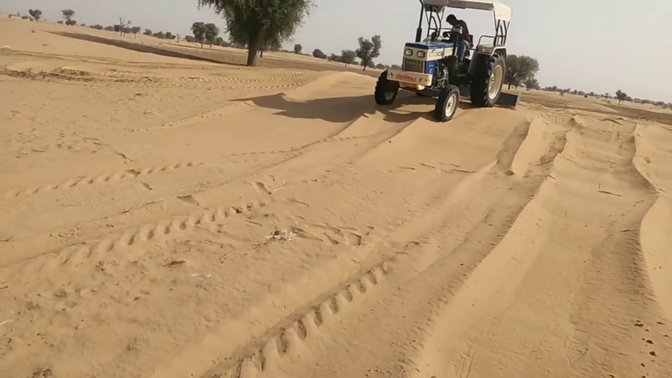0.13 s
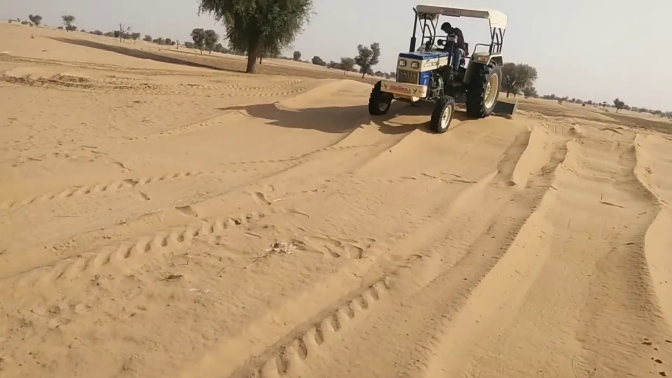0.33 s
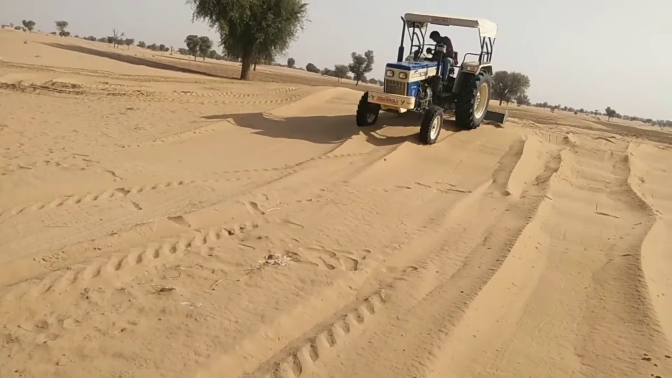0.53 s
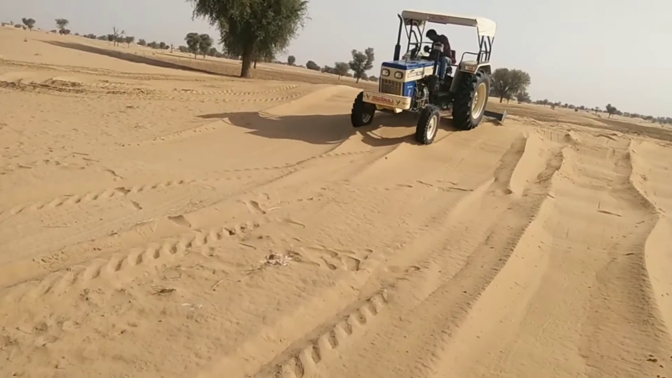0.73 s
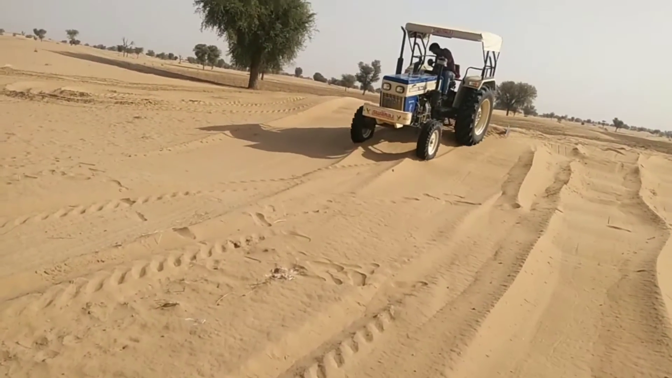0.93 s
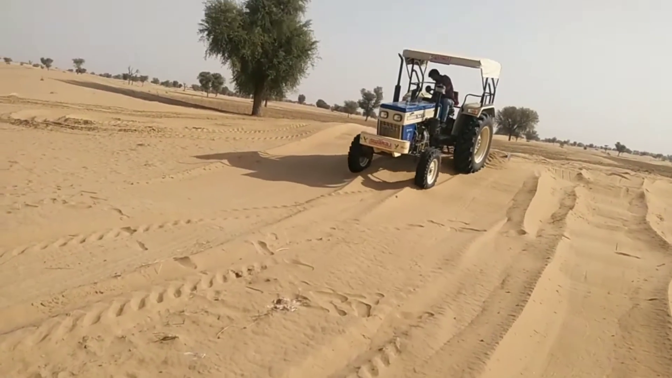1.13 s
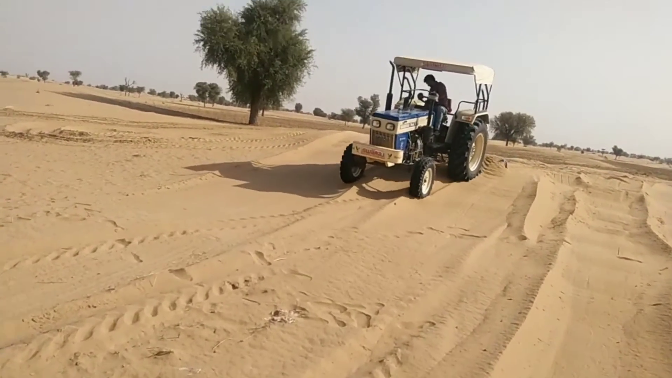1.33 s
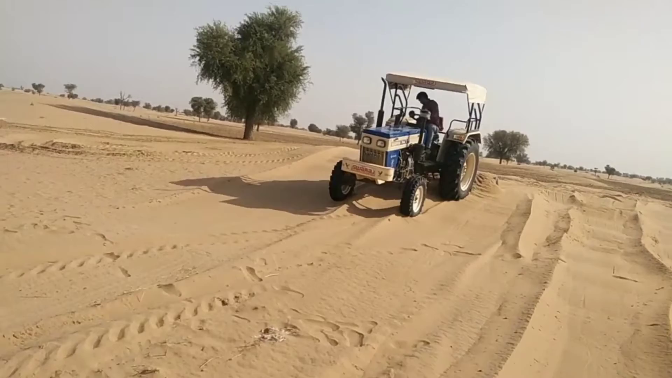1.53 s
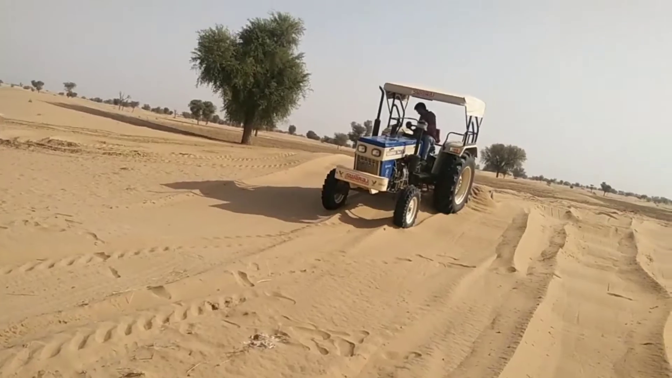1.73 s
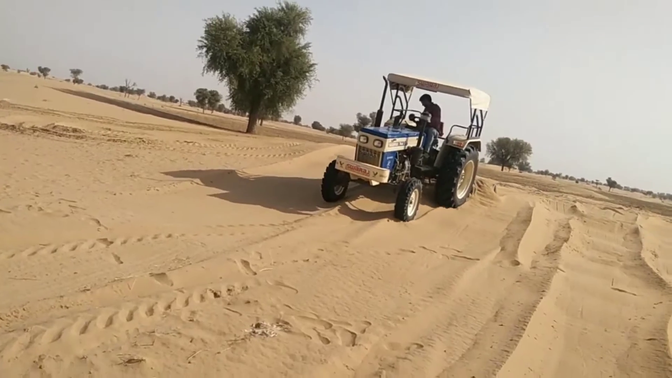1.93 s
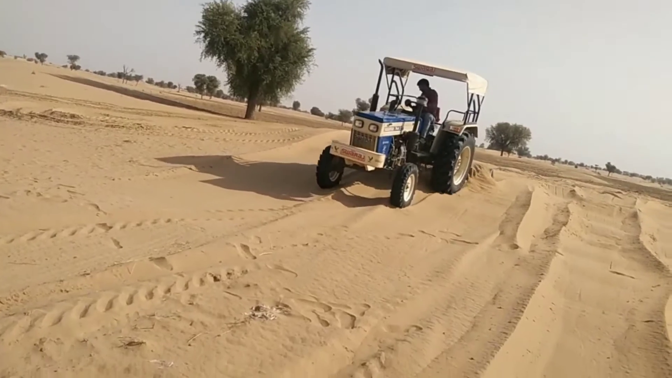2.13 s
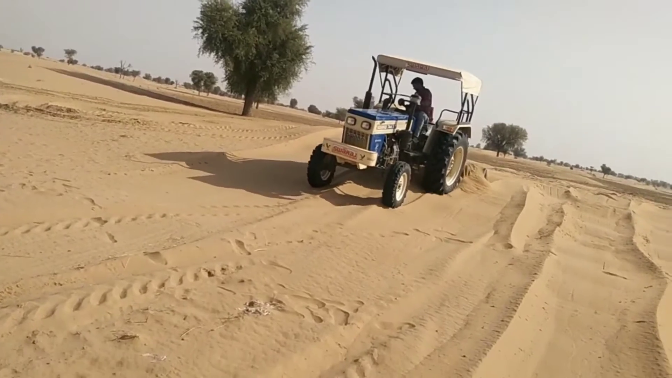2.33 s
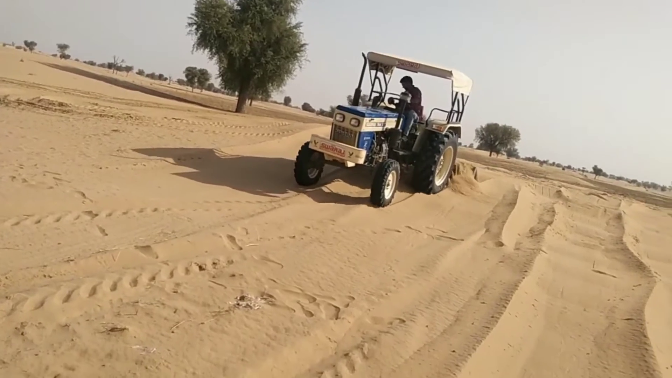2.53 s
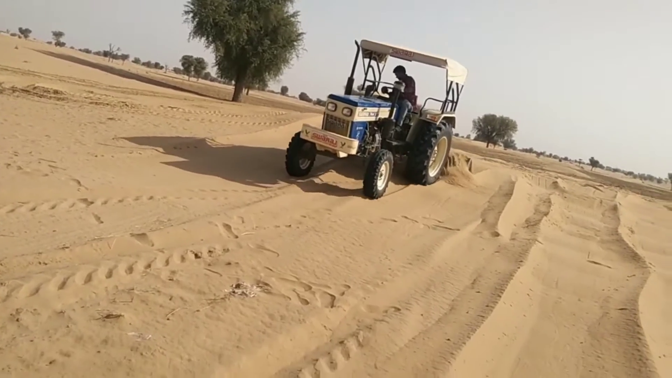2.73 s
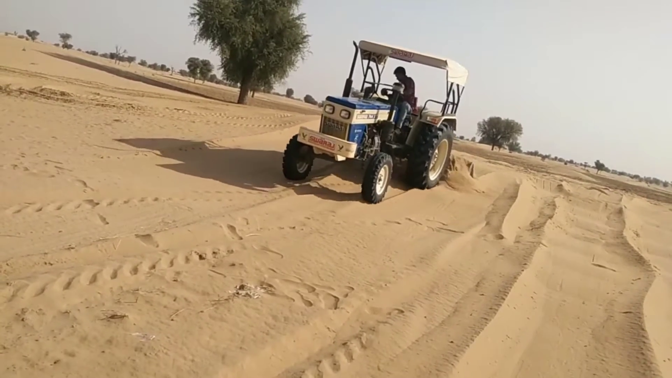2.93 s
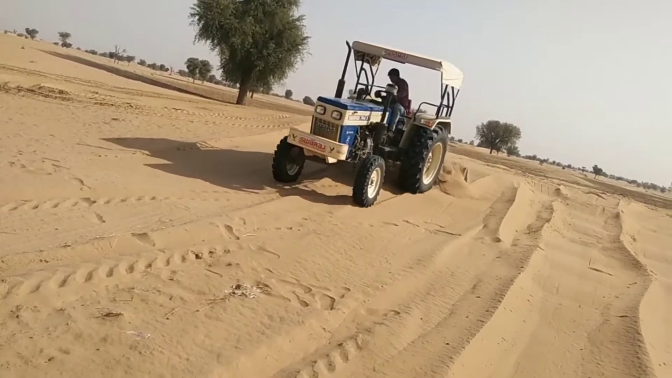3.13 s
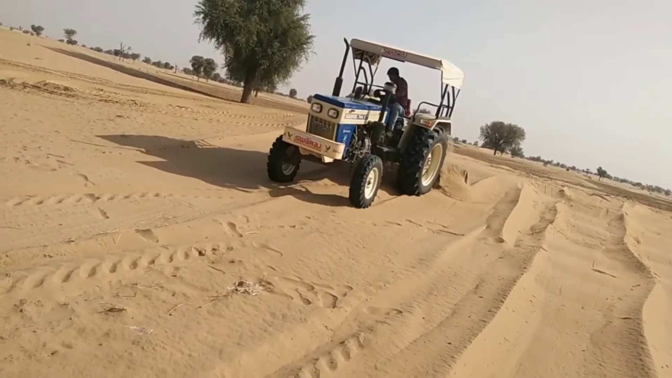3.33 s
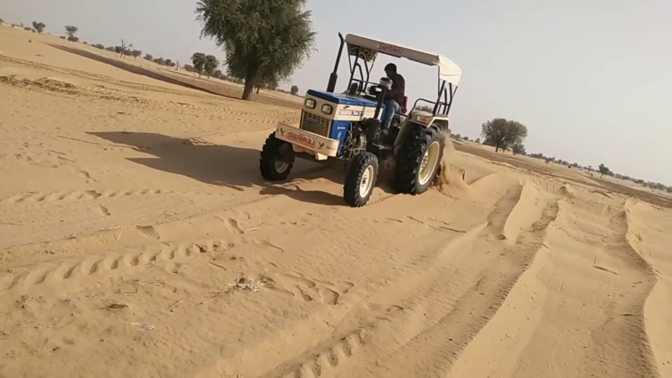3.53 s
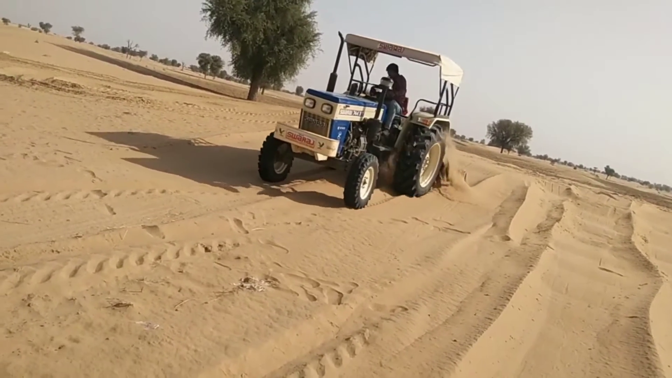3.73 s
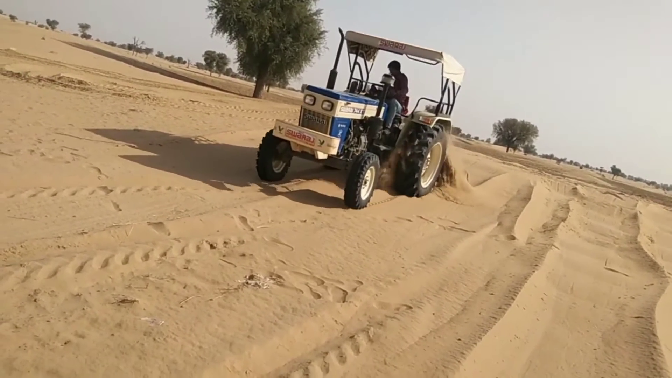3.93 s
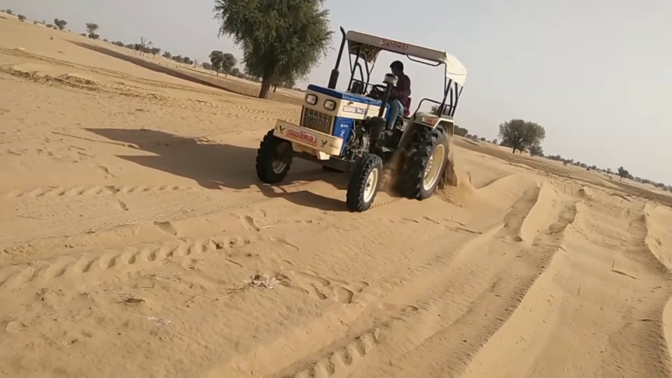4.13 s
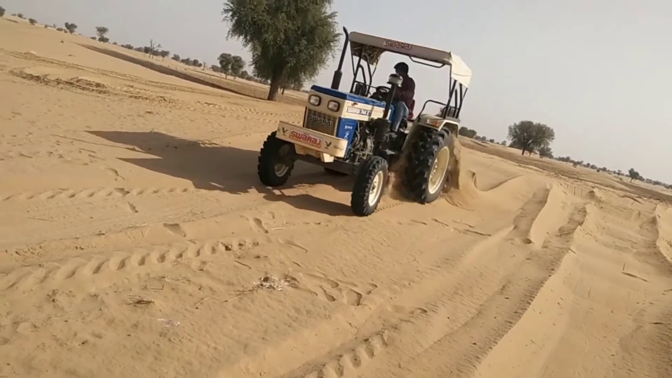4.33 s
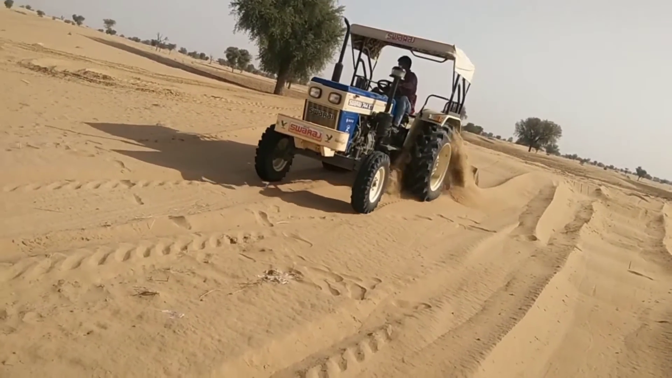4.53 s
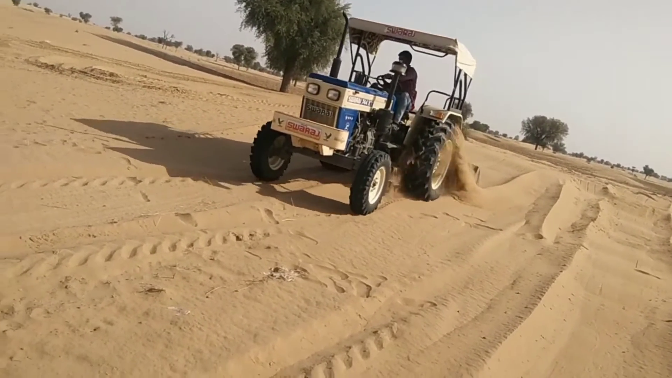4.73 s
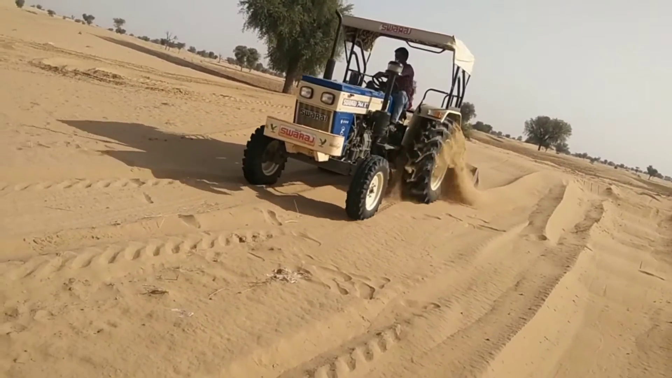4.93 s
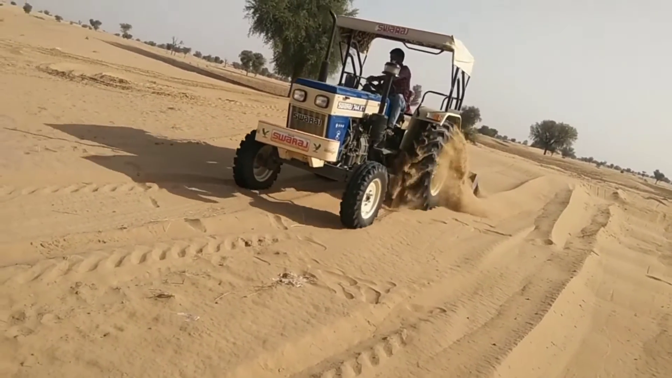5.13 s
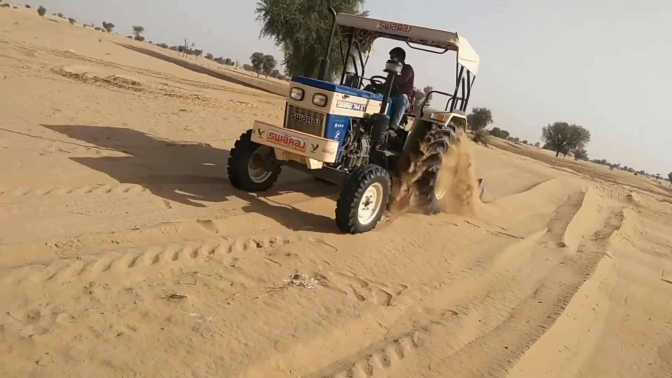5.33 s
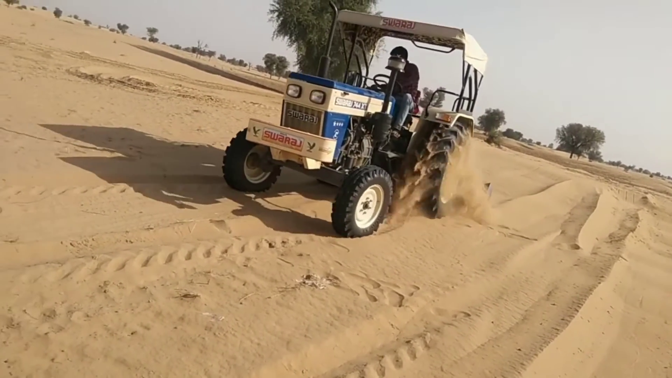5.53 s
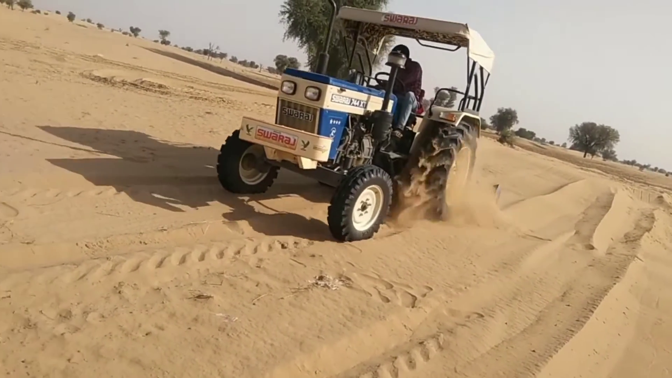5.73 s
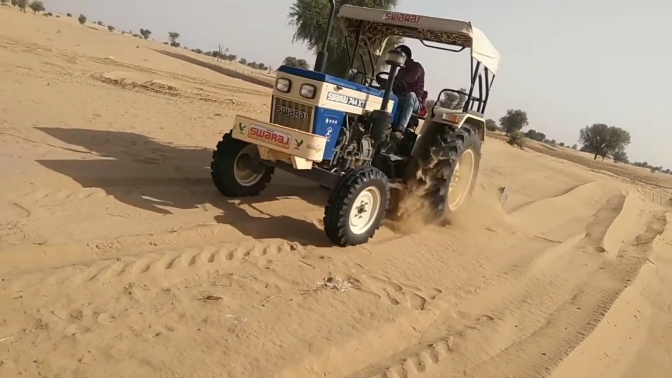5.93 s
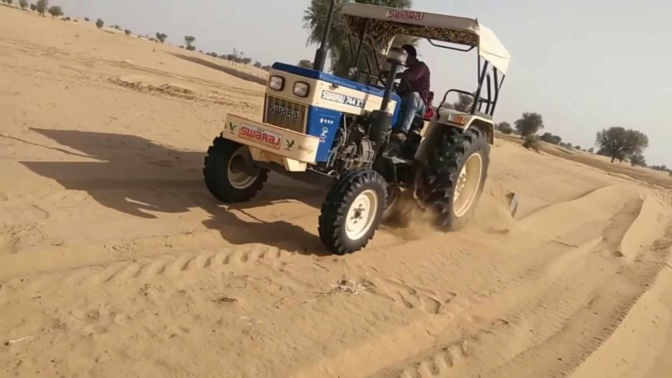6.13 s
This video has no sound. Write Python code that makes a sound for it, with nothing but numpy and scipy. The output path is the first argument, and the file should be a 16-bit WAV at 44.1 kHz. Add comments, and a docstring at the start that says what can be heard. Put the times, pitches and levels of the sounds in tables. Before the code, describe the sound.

A diesel tractor clatters closer outdoors, bogs down after about a second, and labours with hard metallic knocking, brief squeals and sand spraying off its wheels.

```python
"""Loose sand: a two-cylinder diesel tractor crawls closer; after a good second it bogs down and labours.
Each firing sets off metal contacts, modelled as noise ringing in block and bonnet, with bright ticking.
Crank-locked cosines and rumble make the exhaust; tones tied to the crank, with slip, make a low hum.
Coloured random grains are sand off the wheels; decaying noise and sines are the strained parts' ring,
squeals and a late panel boom. A widener spreads it all with short fixed echoes."""
import sys
import numpy as np
from scipy import signal
from scipy.fft import rfft, irfft, next_fast_len
from scipy.io import wavfile
from scipy.ndimage import uniform_filter1d, minimum_filter1d

SR = 44100
rng = np.random.default_rng(int(sys.argv[2]) if len(sys.argv) > 2 else 0)


def waveform_to_disk(signal):
    """Save audio, clipped to [-1, 1], as 16-bit WAV at the path in sys.argv[1]."""
    frames = np.transpose(np.atleast_2d(signal))
    scaled = np.clip(frames, -1, 1) * 32767
    samples = np.round(scaled).astype(np.int16)
    wavfile.write(sys.argv[1], SR, samples)


N = 272538
TIME = np.arange(N) / SR
SIZE = next_fast_len(N + SR // 4, True) // 2 * 2  # even padded FFT length
HZ = np.maximum(np.arange(SIZE // 2 + 1) * SR / SIZE, 1)


def from_db(db):
    """Decibels to amplitude gain."""
    return 10 ** (np.asarray(db) / 20)


def rms_one(x):
    """Scale to unit power."""
    return x / np.sqrt(np.mean(x ** 2) + 1e-20)


def in_time(rows):
    """Each column of a curve at every sample."""
    s, *columns = np.transpose(rows)
    return [np.interp(TIME, s, c) for c in columns]


def spectrum(points):
    """Curve in dB at every FFT frequency, straight over log frequency."""
    hz, db = np.transpose(points)
    return np.interp(np.log(HZ), np.log(hz), db)


def colour(x, db):
    """Minimum-phase (causal) filter with the given gain curve; unit power out."""
    cepstrum = irfft(np.log(from_db(db)))
    # fold onto positive time
    cepstrum[1:SIZE // 2] *= 2
    cepstrum[SIZE // 2 + 1:] = 0
    response = np.exp(rfft(cepstrum))
    return rms_one(irfft(rfft(x, SIZE) * response)[:N])


def drift(knots_per_s):
    """Slow chance: normal random knots joined by straight lines."""
    knots = rng.standard_normal(2048)
    return np.interp(TIME * knots_per_s, np.arange(len(knots)), knots)


def bursts(times_s, power, decay_s):
    """Power that jumps at each contact and dies away exponentially."""
    clicks = np.zeros(N)
    np.add.at(clicks, np.clip((times_s * SR).astype(int), 0, N - 1), power)
    return signal.lfilter([1], [1, -np.exp(-1 / (decay_s * SR))], clicks)


def turning(views):
    """Crossfade from one angle of view to the next as the tractor nears."""
    # (start [s], end [s]) of each change of view
    view_changes = [(1.15, 1.57), (3.3, 3.3), (4.5, 4.68), (5.23, 5.3)]
    out = views[0]
    for span_s, view in zip(view_changes, views[1:]):
        out = out + np.interp(TIME, span_s, [0, 1]) * (view - out)
    return out


def layer_db(law, load):
    """Level of an engine layer, linear in load and in a steady approach."""
    base_db, load_db, approach_db = law
    return base_db + load_db * load + approach_db * TIME / TIME[-1]


def knocking(turns, load):
    """Clatter power, mean near 1: a cluster of contacts per crank turn over steady gear whirr."""
    # contacts after each firing: (angle [crank turns], level [dB])
    contacts = [(.06, -2), (.14, 0), (.23, -.5), (.33, -1.5), (.44, -4)]
    decay_s, jitter_turns, contact_db, firing_db = .0026, .016, 1.1, .7
    firing = np.arange(int(turns[-1]) + 1)[:, None]
    angle_turns, level_db = np.transpose(contacts)
    chance = rng.standard_normal((len(firing), 3, len(angle_turns)))
    contact_turns = firing + angle_turns + jitter_turns * chance[:, 0]
    times_s = np.interp(contact_turns, turns, TIME, left=-1, right=-1)
    spread_db = contact_db * chance[:, 1] + firing_db * chance[:, 2, :1]
    power = from_db(level_db + spread_db) ** 2
    inside = times_s >= 0
    knocks = bursts(times_s[inside], power[inside], decay_s)
    # divide by the local mean
    knocks /= uniform_filter1d(uniform_filter1d(knocks, size=4200), size=2800) + 1e-9
    knock_share = np.clip(1.6 * load, .25, .92)
    return 1 - knock_share + knock_share * knocks


def shaking(power, snap_s=0.00033):
    """Each rise in power gives a sharp snap, then a dense run of tiny impacts of random sign."""
    impacts_per_s = 4000  # nominal: coincident impacts merge
    jump = np.maximum(np.diff(power, prepend=power[0]), 0)
    steps = rng.exponential(1, N) ** 2 / 2
    count = np.floor(np.cumsum(steps) * impacts_per_s / SR)
    impacts = np.diff(count, prepend=0) > 0
    snaps = np.sqrt(jump * snap_s * SR)
    chatter = np.sqrt(power) * rms_one(1. * impacts)
    return (snaps + chatter) * rng.choice([-1, 1], N)


def engine_force(power, low_hz=1650, high_hz=3800):
    """Force on the block: sharpest knocks in its own band, more even shaking outside it."""
    outside_exponent = .6
    inside = signal.butter(3, [low_hz, high_hz], "band", fs=SR, output="sos")
    outside = signal.butter(3, [low_hz, high_hz], "bandstop", fs=SR, output="sos")
    sharp = signal.sosfilt(inside, rms_one(shaking(power)))
    even = signal.sosfilt(outside, rms_one(shaking(power ** outside_exponent)))
    return sharp + even


def engine_body(force):
    """Block and bonnet resonances ring; their balance shifts with the view and wavers by chance."""
    # resonances: (centre [Hz], width [Hz], height from each of five views, far to near [dB] x 5)
    body_modes = np.array([(210, 98, 14, 2.5, 5, 0.5, -1), (313, 43, 0.5, 1.0, 2.5, 0, 8.5),
                           (440, 110, 1, 1.5, -2.5, -10, -3.5), (728.4, 57, 8.6, 3.5, 7, 7.5, 10.5),
                           (823, 87, 0.88, 9.5, 10.5, 11, 9.5), (1017, 115, 4.6, 0, -10, -13.5, -6),
                           (1136, 146, 8.4, 5, 9, 11, 8.5), (1324, 92, 3.9, 4, 4.5, 3.5, 5.5),
                           (1444, 41, 4.9, 5.5, 5.5, -5, 11), (1555, 73, 4, 1.5, -2.5, 11.5, 3.5),
                           (1777, 31, 3.7, -15, 5.5, 0, -2), (1876, 138, 2.4, 10.5, 7.5, -0.5, 6),
                           (1995, 170, 4.7, -3, -0.5, -1, 2), (2236, 170, 2, 6, 9.5, 7.5, 7.5),
                           (2450, 55, 7.9, 6.5, 2.5, 5, 9), (2656, 97, 8.3, 12, 9.5, 3.5, 10),
                           (2817, 150, 5.9, 2, 8, 8.5, 7.5), (2937, 52, 2.5, 11.5, 7, 7, 5.5),
                           (3080, 80, 8.4, -6, -9, 7.5, 5), (3280, 114, 5.6, 3.5, 4, 3, -0.5),
                           (3461, 37, 2.0, 7, 10, 8.5, 12.5), (3550, 2800, 0.5, 1.5, -1, 1, 1)])
    # broad colour of the block: (frequency [Hz], relative level [dB])
    block_colour = [(60, -16), (250, -22.5), (480, -21.5), (650, -15), (900, -11.5), (1200, -6),
                    (1600, -2.5), (2200, 0), (2900, -4.5), (3250, -3), (3600, -5), (4100, -14.5),
                    (5000, -46), (8000, -56)]
    waver_db, waver_per_s = 2.3, 30
    bumps = 1 / (1 + (2 * (HZ - body_modes[:, :1]) / body_modes[:, 1:2]) ** 2)
    views = [colour(force, spectrum(block_colour) + heights_db @ bumps)
             for heights_db in body_modes[:, 2:].T]
    body = turning(views)
    wavering = np.zeros(N)
    for hz, width_hz in body_modes[:, :2]:
        resonance = signal.lfilter(*signal.iirpeak(hz, hz / width_hz, fs=SR), body)
        wavering += (from_db(waver_db * drift(waver_per_s)) - 1) * resonance
    return rms_one(body + wavering)


def clatter(power, clatter_db, drone_db, gain_db=-2.0, drone_offset_db=19.0):
    """Knocks shake the body; the large bonnet panels, below 1 kHz, have their own level."""
    body = engine_body(engine_force(power))
    panels = signal.sosfiltfilt(signal.butter(4, 1000, fs=SR, output="sos"), body)
    upper = from_db(clatter_db) * (body - panels)
    return from_db(gain_db) * (upper + from_db(drone_db + drone_offset_db) * panels)


def ticking(power, level_db, follow=0.76, gain_db=0.4):
    """Bright edge of the same contacts: noise following their power, its colour shifting with the view."""
    # (frequency [Hz], relative level far [dB], midway [dB], near [dB])
    tick_colours = np.array([(2500, -14.5, -4, -14.5), (4600, 2, 1.5, 1.5), (5540, -5, -7.5, 2),
                             (5900, 1.5, -2.5, -4), (7130, 9, 7.5, 6.5), (8300, -2, 3.5, 5),
                             (9150, -7, -4, -3.5), (10950, -9.5, -8.5, -9), (13800, -19, -16, -17),
                             (16000, -60, -57, -57)])
    force = power ** (follow / 2) * rng.standard_normal(N)
    views = [colour(force, spectrum(np.c_[tick_colours[:, 0], db])) for db in tick_colours[:, 1:].T]
    return from_db(level_db + gain_db) * turning(views)


def exhaust(turns, labour, rumble_db, lag_turns=-0.037, stumble_turns=0.007, waver_db=1.3,
            puff=0.5, puff_turns=0.1):
    """A pressure pulse per firing, a little early or late; puffs also swell a turbulent rumble."""
    # pulse harmonics: (multiple of firing rate, level running light [dB], labouring [dB])
    pulse_orders = [(2, -63, -52), (3, -64, -55), (4, -59, -51.5), (5, -59, -48), (6, -59, -53),
                    (7, -61, -61), (8, -61, -62)]
    # (frequency [Hz], relative level [dB])
    rumble_colour = [(20, -31), (45, -14), (70, 3.5), (110, -2), (160, -5), (220, -6.5), (320, -21.5),
                     (600, -51)]
    crank_rad = 2 * np.pi * (turns - lag_turns + stumble_turns * drift(18))
    pulses = np.zeros(N)
    for order, light_db, heavy_db in pulse_orders:
        level_db = light_db + (heavy_db - light_db) * labour + waver_db * drift(8)
        pulses -= from_db(level_db) * np.cos(order * crank_rad)
    puffs = 1 + puff * np.cos(2 * np.pi * (turns - puff_turns))
    stirred = puffs * rng.standard_normal(N)
    return pulses + from_db(rumble_db) * colour(stirred, spectrum(rumble_colour))


def hum(turns, labour, throb_turns=0.14):
    """Low tone, perhaps a belt-driven part, slipping on the crank; side tones make it throb per firing."""
    # (time [s], hum cycles per crank turn)
    hum_ratio = [(0, 3.64), (1.2, 3.66), (2.2, 3.64), (2.52, 3.5), (2.85, 3.66), (3.8, 3.63), (4.15, 3.53),
                 (4.45, 3.61), (4.95, 3.53), (5.4, 3.6), (6.18, 3.56)]
    # (offset from hum [firing rates], level running light [dB], labouring [dB])
    hum_tones = [(-1, -52, -40), (0, -42.5, -41.5), (1, -53, -56)]
    cycles = np.cumsum(in_time(hum_ratio)[0] * np.gradient(turns))
    out = np.zeros(N)
    for offset, light_db, heavy_db in hum_tones:
        phase_rad = 2 * np.pi * (cycles + offset * (turns - throb_turns))
        out += from_db(light_db + (heavy_db - light_db) * labour) * np.cos(phase_rad)
    return out


def sand(grains_per_s=7000, clump_db=2.5):
    """Grains flung by the tyre lugs: coloured random impulses whose level clumps by chance."""
    # (time [s], level before clumping [dB])
    spray_level = [(0, -59), (1.2, -59), (2.5, -39), (4, -40), (5.2, -39), (6.18, -36.5)]
    # (frequency [Hz], relative level [dB])
    sand_colour = [(1500, -1.5), (4500, -2), (7000, -17), (14000, -22)]
    grains = (rng.random(N) < grains_per_s / SR) * rng.standard_normal(N)
    level_db = in_time(spray_level)[0] + clump_db * drift(14)
    return from_db(level_db) * colour(grains, spectrum(sand_colour))


def hard_knocks(decay_s=0.002, crest_db=5.0):
    """Power of single hard blows, set crest_db below their nominal peaks."""
    # (time [s], nominal peak level [dB])
    blows = [(0.7582, -4.5), (0.7674, -8), (1.3865, -9), (1.4295, -10), (1.5289, -8), (1.5534, -6.5),
             (1.654, -8), (1.9724, -3.5), (2.0305, -7), (2.3835, -8), (2.7613, -8), (2.8886, -7.5),
             (3.3024, -8), (3.7135, -8), (3.875, -1.5), (3.9374, -5.5), (4.2777, -9), (4.3111, -7),
             (4.5992, -8), (4.9378, -7), (5.0789, -7), (5.3063, -2), (5.3328, -5.5), (5.3694, -7),
             (6.12, -8)]
    s, peak_db = np.transpose(blows)
    return bursts(s, from_db(peak_db - crest_db) ** 2, decay_s)


def rattling():
    """Clatter swell in dB: brief fits of louder rattling over a slight chance waver."""
    # (middle [s], added level [dB], length [s])
    rattle_fits = [(0.766, 0, 0.062), (1.44, 2.5, 0.06), (1.59, 2, 0.087), (3.792, 2, 0.28),
                   (6.106, 1, 0.26)]
    waver_db, waver_per_s = 0.5, 9
    fits_db = sum(db * np.exp(-(2 * (TIME - s) / length_s) ** 2) for s, db, length_s in rattle_fits)
    return fits_db + waver_db * drift(waver_per_s)


def squeals(wobble=0.0061, sag_per_s=0.099):
    """Short squeals of the straining machine: near-pure tones that swell, sag in pitch and fade."""
    # (middle [s], pitch at middle before wobble [Hz], peak level [dB], length [s])
    squeal_tones = [(4.094, 1217, -25.5, 0.029), (4.168, 1187, -21, 0.023), (4.392, 1915, -22, 0.063),
                    (4.984, 1220, -21.5, 0.044), (5.083, 2713, -8.5, 0.0065), (6.016, 1520, -27, 0.08)]
    out = np.zeros(N)
    for s, hz, level_db, length_s in squeal_tones:
        pitch_hz = hz * (1 + wobble * drift(80) - sag_per_s * (TIME - s))
        phase_rad = 2 * np.pi * np.cumsum(pitch_hz) / SR
        swell = np.exp(-(2 * (TIME - s) / length_s) ** 2)
        out += from_db(level_db) * swell * np.sin(phase_rad)
    return out


def ringing(knocks):
    """Knocks ring a strained part: a noise-fed resonance whose pitch sinks as the engine picks up."""
    # (time [s], pitch [Hz], level [dB])
    ring_track = [(4.4, 2750, -50), (4.7, 2760, -29), (4.92, 2755, -23.5), (5.08, 2700, -22),
                  (5.17, 2630, -24.5), (5.27, 2520, -30), (5.34, 2280, -24), (5.42, 2230, -33),
                  (5.54, 2200, -27), (5.8, 2200, -50)]
    hz, level_db = in_time(ring_track)
    width_hz = 40
    decay = np.exp(-np.pi * width_hz / SR)
    noise = rng.standard_normal(N) + 1j * rng.standard_normal(N)
    envelope = signal.lfilter([1], [1, -decay], knocks * noise)
    carrier = np.exp(2j * np.pi * np.cumsum(hz) / SR)  # shifts the resonance up to pitch
    return from_db(level_db) * rms_one((envelope * carrier).real)


def boom(slip_rad=0.64):
    """A loose panel, late on, hums at its own pitch with wavering level and phase."""
    start_s, swell_s, pitch_hz, level_db, waver_db = 5.15, 0.051, 322, -53, 3
    swell = np.clip((TIME - start_s) / swell_s, 0, 1)
    gain = swell * from_db(level_db + waver_db * drift(12))
    return gain * np.sin(2 * np.pi * pitch_hz * TIME + slip_rad * drift(30))


def widen(x, bass_hz=65, narrow_hz=240, narrowing=0.31):
    """Each side adds its own short echoes, some inverted: weaker in the bass, the deepest left central."""
    # left list, right list: (delay [ms], gain before bass cut)
    side_echoes = [
        [(15.01, -.43), (16.51, -.38), (18.32, .59), (19.82, .66), (21.32, -.37), (30.68, .47), (32.18, .53),
         (33.67, -.3)],
        [(15.01, .43), (16.51, .57), (18.0, -.37), (21.32, .54), (26.05, .61), (30.68, -.33), (35.87, -.32),
         (37.37, -.35)],
    ]
    out = np.array([x, x])
    feed = signal.sosfiltfilt(signal.butter(2, bass_hz, "high", fs=SR, output="sos"), x)
    low = signal.sosfiltfilt(signal.butter(2, narrow_hz, fs=SR, output="sos"), feed)
    feed = feed - narrowing * low
    for side, echoes in zip(out, side_echoes):
        for ms, gain in echoes:
            lag = round(ms * SR / 1000)
            side[lag:] += gain * feed[:N - lag]
    return out


def scene():
    """Crank angle and load drive the engine layers; the widener spreads the sum."""
    # crankshaft: (time [s], speed [rpm])
    crank_speed = [(0.0, 1536.0), (.45, 1581.0), (.75, 1713.0), (1.2, 1750.0), (1.56, 1816.0),
                   (1.78, 1904.0), (2.36, 1902.0), (2.84, 1859.0), (3.2, 1906.0), (4.07, 1922.0),
                   (5.0, 1752.0), (5.52, 1922.0), (6.18, 1922.0)]
    # how hard the engine labours: (time [s], load [0-1])
    engine_load = [(0, 0.01), (.57, 0.03), (.74, 0.23), (.95, 0.09), (1.22, 0.16), (1.29, 0.5),
                   (3.18, 0.51), (3.42, 0.35), (4.1, 0.35), (4.45, 0.48), (5.0, 0.38), (5.35, 0.5),
                   (5.77, 0.36), (6.18, 0.47)]
    # layer laws, before layer trims: (far and unloaded [dB], full load adds [dB], approach adds [dB])
    clatter_law = (-24.5, 15.13, 1.57)
    drone_law = (-41, 11.26, 7.6)
    ticking_law = (-50.5, 26, -2.7)
    rumble_law = (-51.5, 9.5, 2)
    turns = .617 + np.cumsum(in_time(crank_speed)[0]) / (60 * SR)
    load, = in_time(engine_load)
    labour = np.clip(3.6 * load - .6, 0, 1)
    clatter_db = layer_db(clatter_law, load) + rattling()
    knocks = knocking(turns, load)
    power = knocks + hard_knocks() / from_db(clatter_db) ** 2  # blows keep their own level
    metal = clatter(power, clatter_db, layer_db(drone_law, load))
    metal = metal + ticking(power, layer_db(ticking_law, load))
    bass = exhaust(turns, labour, layer_db(rumble_law, load)) + hum(turns, labour) + boom()
    return widen(metal + bass + ringing(knocks) + squeals() + sand())


def record(dry):
    """Cut the top, then hold down the highest peaks with a fast limiter common to both sides."""
    cutoff_hz = 14700
    out = signal.sosfilt(signal.ellip(10, .2, 80, cutoff_hz, fs=SR, output="sos"), dry)
    gain = np.minimum(1, .97 / (abs(out).max(axis=0) + 1e-9))
    return out * uniform_filter1d(minimum_filter1d(gain, size=89), size=89)


dry = scene()
out = record(dry)
waveform_to_disk(out)
```